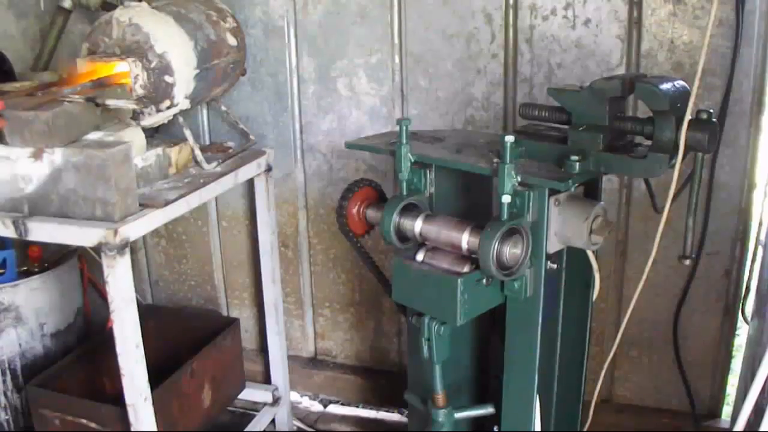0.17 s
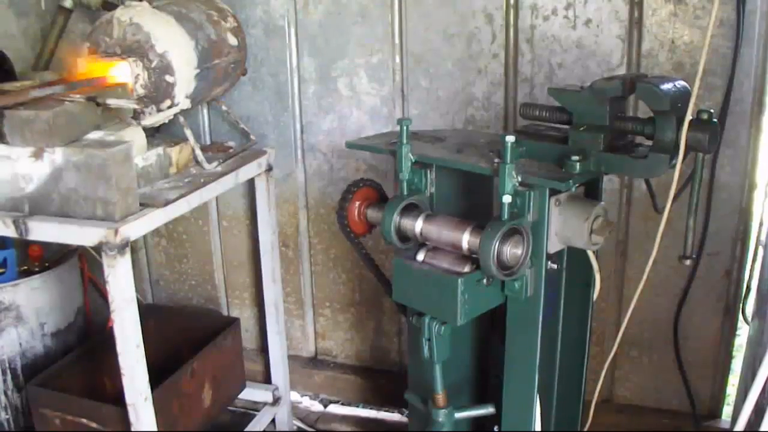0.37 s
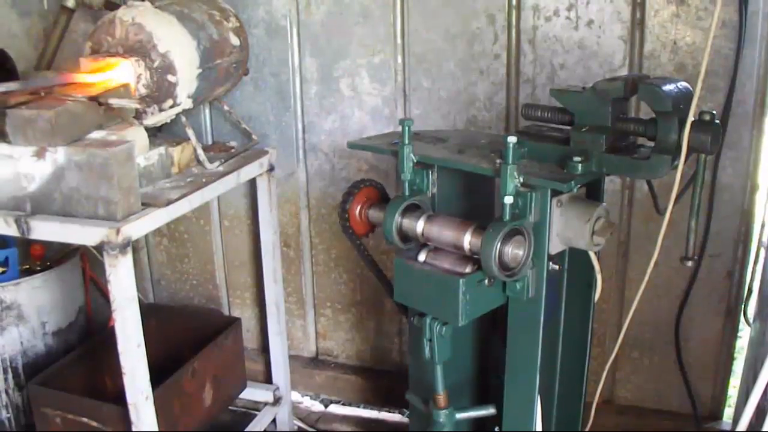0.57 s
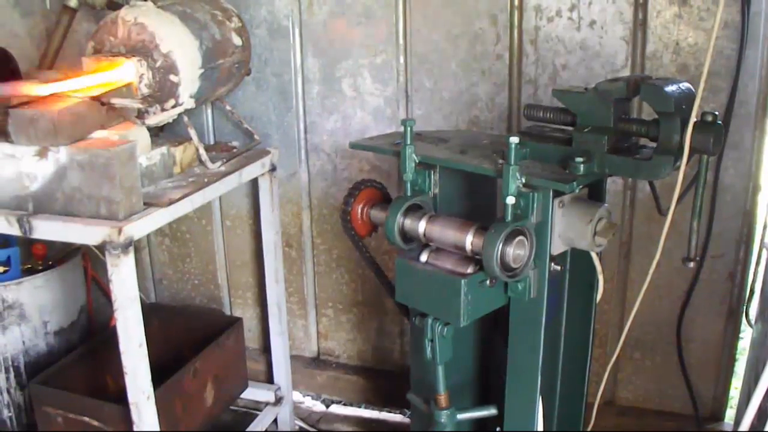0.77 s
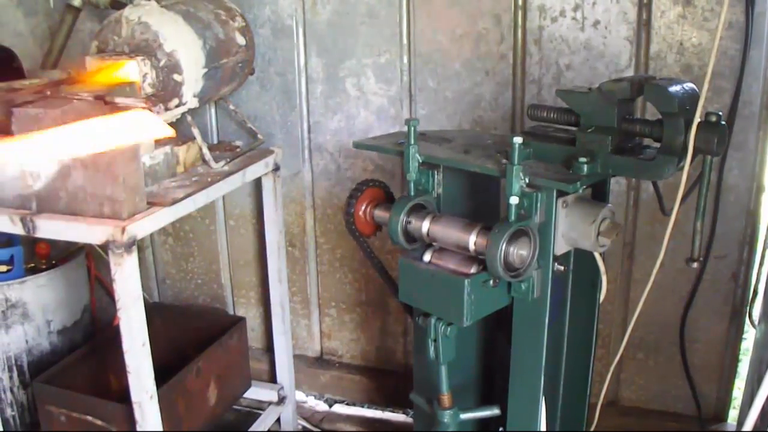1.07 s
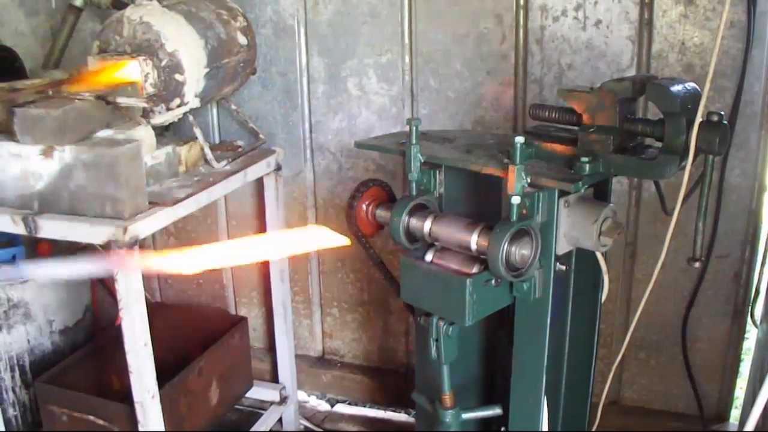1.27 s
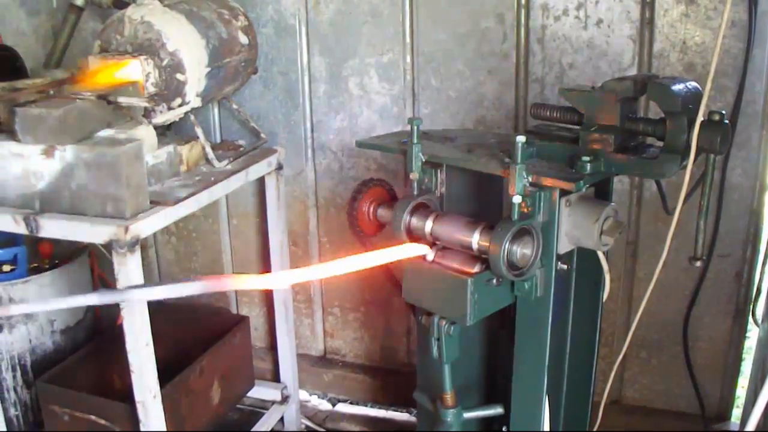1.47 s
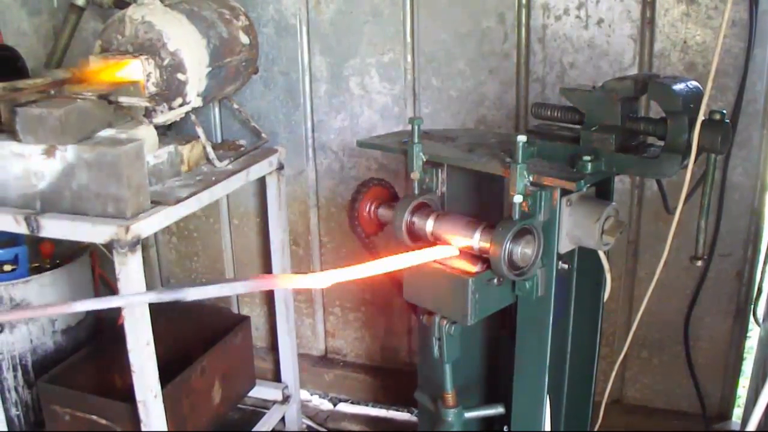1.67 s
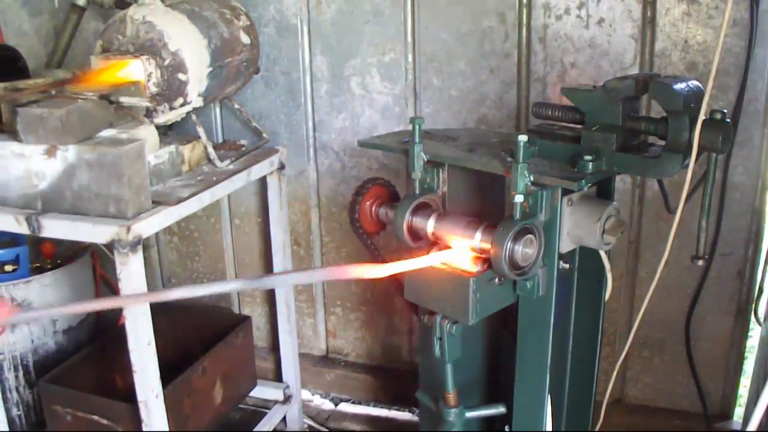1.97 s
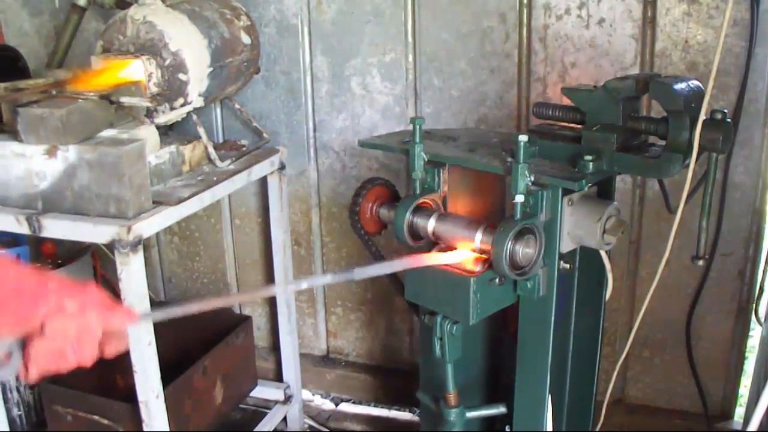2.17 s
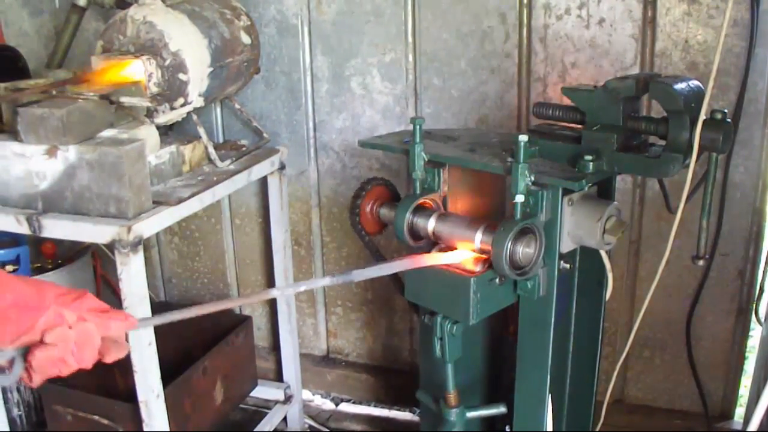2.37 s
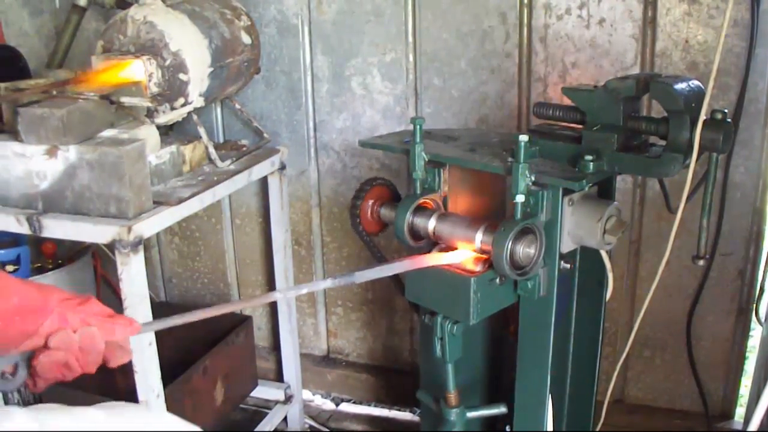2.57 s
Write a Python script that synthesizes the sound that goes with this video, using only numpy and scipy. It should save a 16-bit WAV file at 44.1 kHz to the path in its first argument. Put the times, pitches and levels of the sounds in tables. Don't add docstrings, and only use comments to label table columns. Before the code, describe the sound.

A gas forge roars from just after 0.07 s, following brief silence, to the cut-off near 2.7 s. Its deep, hollow flutter carries steady air and gas hiss. Frequent irregular pressure surges click and make the level dip and recover. A faint mill whine wavers underneath, stronger around 0.7 and 1.3 s. Small steel ticks fall near 0.46, 0.66, 1.3, 2.0 and 2.2 s.

```python
import sys
import numpy as np
from scipy import signal
from scipy.fft import rfft, irfft, next_fast_len
from scipy.io import wavfile
from scipy.ndimage import uniform_filter1d, minimum_filter1d, map_coordinates

SR = 44100
rng = np.random.default_rng(int(sys.argv[2]) if len(sys.argv) > 2 else 0)


def voltage_ratio(level):
    return 10 ** (np.asarray(level, float) / 20)


def store_pcm(level_fs):
    pcm = np.round(np.clip(level_fs, -1, 1) * 32767).astype(np.int16)
    wavfile.write(sys.argv[1], SR, np.atleast_2d(pcm).T)


N = 119511

# t/s, swing/full scale, gain cut/dB, first snap/dB
STRONG_SURGES = [(0.1215, -0.95, 3.7, 1.0), (0.1772, -0.83, 3.0, 1.4), (0.3122, 0.76, 0.0, 1.2),
                 (0.3545, -0.71, 2.8, 1.3), (0.43, -0.71, 2.1, 1.5), (0.4427, 0.75, 4.3, 1.2),
                 (0.5315, 0.71, 5.5, 1.2), (0.6722, -0.84, 1.5, 1.6), (0.781, -0.74, 1.0, 2.0),
                 (0.8187, -0.76, 3.7, 1.5), (0.8555, 0.73, 2.4, 0.4), (0.9263, -0.82, 2.9, 1.6),
                 (1.0202, 0.73, 4.3, 1.9), (1.1713, -0.98, 5.1, 2.5), (1.3448, 0.39, 2.7, 0.6),
                 (1.3938, 0.84, 1.6, 0.8), (1.4073, 0.74, 5.4, 1.5), (1.4832, 0.71, 4.6, 1.8),
                 (1.5859, -0.79, 3.4, 1.0), (1.6812, -0.75, 4.1, 1.8), (1.7433, 0.8, 4.8, 1.4),
                 (1.8895, 0.77, 2.4, 1.7), (1.9986, -0.99, 1.3, 1.5), (2.0379, 0.76, 3.1, 1.1),
                 (2.0801, 0.9, 3.1, 1.5), (2.1876, 0.91, 6.4, 2.1), (2.3031, -0.89, 4.3, 2.8),
                 (2.3985, -0.74, 4.7, 1.1), (2.5071, -1.0, 1.9, 2.9), (2.5977, 0.95, 2.6, 2.3)]
# t/s,
# swing/full scale, gain cut/dB, first snap/dB
WEAK_SURGES = [(.0705, -.55, .1, .1), (.11, -.4, .3, .8), (.1536, -.7, .3, .7), (.195, .4, 1.5, .2),
               (.5145, .47, .3, .9), (.5955, .61, .3, 1.3), (.69, -.6, 1.5, .2), (.7681, .8, .3, 1.3),
               (.8883, -.7, .5, .8), (1.052, -.8, .4, .7), (1.195, .4, 2, .4), (1.8074, -.7, .3, .8),
               (2.3672, -.64, .3, 1.5), (2.4944, .68, .3, 1.1), (2.53, -.5, 1.5, .3),
               (2.7076, .7, 1.5, 1.2)]
# t/s, flame strength/dB, draught swell/dB
FIRE = [(0, -21.5, -4.7), (.25, -12, 2.3), (.5, -14, 0.3), (.75, -11.5, 2.5), (.95, -13.5, 0.1),
        (1.15, -12.5, 2.5), (1.25, -11, 1.2), (1.35, -12, 1.7), (1.6, -14.5, 0.8), (1.85, -12, 1.7),
        (2.0, -13, 0.8), (2.2, -13, 0.6), (2.45, -10.5, 1.05), (2.71, -12, 2.2)]


def unit(x):
    return x / np.sqrt(np.mean(x ** 2) + 1e-20)


def wobble(rate):
    points = rng.standard_normal(int(N * rate / SR) + 4)
    return map_coordinates(points, [np.arange(N) * rate / SR])


def noise(response, patchy_db):
    grid = signal.stft(rng.standard_normal(N + 512), nperseg=512)[2]
    patches = uniform_filter1d(rng.standard_normal(grid.shape), 6, 0)
    patches = uniform_filter1d(patches, 10, 1)
    x = signal.istft(grid * voltage_ratio(patchy_db * unit(patches)), nperseg=512)[1][:N]
    m = next_fast_len(N + 8192)
    shaped = rfft(x, m) * response(np.fft.rfftfreq(m, 1 / SR))
    return unit(irfft(shaped, m)[:N])


def colour(points):
    f, db = np.transpose(points)
    return lambda hz: voltage_ratio(np.interp(np.log(hz + 1), np.log(f + 1), db))


def peak(hz, centre, width):
    return 1j * hz * width / (centre ** 2 - hz ** 2 + 1j * hz * width)


def chamber_ring():
    mode_hz = [132, 166, 195, 250, 293, 322, 358, 376, 432, 508]
    # width/Hz, level/dB
    modes = [(28, -13.5), (9, 3.5), (16.5, 0.5), (39.8, -3.5), (10.9, 6.5), (14, -1), (12, -5), (13.9, 3.5),
             (20.4, -3.5), (47.4, -6.5)]

    def response(hz):
        power = sum(abs(voltage_ratio(db) * peak(hz, centre, 1.07 * width) ** 2) ** 2
                    for centre, (width, db) in zip(mode_hz, modes))
        low_cut = hz ** 2 / (hz ** 2 + 110 ** 2)
        high_cut = 1 / (1 + (hz / 620) ** 4)
        return low_cut * high_cut * np.sqrt(power)

    return noise(response, patchy_db=0.6)


def flame(strength_db):
    # f/Hz, level/dB per Hz
    roar_colour = [(15, -60), (25, -27), (65, -11.5), (167, 7), (295, -9), (374, 10.5), (480, -16.5),
                   (700, -21.5), (910, -59), (1540, -120)]
    broad = noise(colour(roar_colour), patchy_db=0.17)
    roar = unit(chamber_ring() + voltage_ratio(-5) * broad)
    roar = roar * voltage_ratio(strength_db - 0.2 * wobble(25.46))

    calm = 0.72
    gain = voltage_ratio(gain_db())
    need = np.minimum(1, calm / (abs(roar) * gain + 1e-9))
    half = 1200
    x = np.pad(roar * uniform_filter1d(minimum_filter1d(need, size=301), size=301), (0, half))

    surge_hz, surge_s, lead_s = 270, .0024, .0003
    u = np.arange(-half, half) / SR
    hump = np.exp(-(u / surge_s) ** 2)
    for s, swing, *_ in [*STRONG_SURGES, *WEAK_SURGES]:
        i = int(s * SR)
        pitch = surge_hz * rng.uniform(0.84, 1.283)
        wave = 0.99 * swing / gain[i - 2] * np.cos(2 * np.pi * pitch * (u + lead_s))
        change = hump * (wave - x[i - half:i + half])
        x[i - half:i + half] += change - change.sum() * hump / hump.sum()
    return x[:N]


def hiss(swell_db):
    # f/Hz, level/dB per Hz
    air_colour = [(290, -33), (500, -6), (842, -10.5), (950, -12), (1210, -14.5), (1790, -16),
                  (2370, -18.5), (3430, -13), (5500, -39.5), (7150, -82), (12100, -120)]
    # f/Hz, level/dB per Hz
    jet_colour = [(2940, -30), (5000, -33.5), (5990, -7), (8200, 5.5), (12000, -12), (13400, -11),
                  (15900, -22), (16300, -28), (16500, -54)]
    shared_db = swell_db + 0.26 * wobble(39.72) + 0.24 * wobble(120)
    air = voltage_ratio(-24 + shared_db) * noise(colour(air_colour), patchy_db=0.62)
    jet = voltage_ratio(-44.5 + shared_db) * noise(colour(jet_colour), patchy_db=0.5)
    return air + jet


def mill_whine():
    whine_hz = [959, 1389, 1590, 1791, 2202, 3360]
    # width/Hz, rms level/dB
    whine = [(31.7, -35), (60, -41), (4, -50.5), (11.7, -40.5), (25, -45.5), (80, -66)]
    # t/s, level/dB
    load = [(0.1, -42), (0.58, -33), (0.68, -29), (1.29, -38), (1.33, -28), (1.47, -39), (1.52, -36),
            (2.34, -35), (2.7, -42)]
    lines = []
    for centre, (width, db) in zip(whine_hz, whine):
        tone = noise(lambda hz: peak(hz, centre, width) ** 2, patchy_db=-1.5)
        lines.append(voltage_ratio(db + 0.47 * wobble(6.9)) * tone)
    load_db = np.interp(np.arange(N) / SR, *np.transpose(load))
    lines[0] = lines[0] * voltage_ratio(load_db - np.mean(load, axis=0)[-1])
    return sum(lines)


def steel_ticks():
    # t/s, level/dB, main ring f/Hz, crack level/dB
    ticks = [
        (0.461, -19, 3440, -8),
        (0.663, -19.5, 1860, -32),
        (1.269, -22, 3340, -35),
        (1.321, -22, 910, -35),
        (1.989, -17, 1790, -28),
        (2.173, -24, 1520, -30),
    ]
    ring_s, crack_s = 0.046, 0.0051
    x, t = np.zeros(N), np.arange(SR // 10) / SR
    for s, db, hz, crack_db in ticks:
        ring = np.sin(2 * np.pi * hz * t) * voltage_ratio(-60 * t / ring_s)
        ring = ring * (1 - np.exp(-t / 0.00087))
        crack = voltage_ratio(crack_db - 60 * t / crack_s) * rng.standard_normal(len(t))
        x[int(s * SR):][:len(t)] += voltage_ratio(db) * (ring + crack)
    return x


def gain_db():
    recover_s, recover_shape, settle_s = 0.12, 1.02, 0.003
    t, db = np.arange(N) / SR, np.full(N, 3.5)
    for s, _, cut_db, snap_db in [*STRONG_SURGES, *WEAK_SURGES[1:]]:
        i = int(s * SR)
        u = abs(t[i:] - s)
        depth = cut_db + (snap_db - cut_db) * np.exp(-u / settle_s)
        db[i:] -= np.exp(-(u / recover_s) ** recover_shape) * depth
    return db


def scene():
    s, strength_db, swell_db = np.transpose(FIRE)
    t = np.arange(N) / SR
    forge = flame(np.interp(t, s, strength_db)) + hiss(np.interp(t, s, swell_db))
    return (forge + mill_whine() + steel_ticks())[None]


def top_cut(x):
    return signal.sosfilt(signal.butter(12, 16740, fs=SR, output="sos"), x)


def record(dry):
    step_db, ceiling = .3, .99
    x = dry * voltage_ratio(np.round(gain_db() / step_db) * step_db)
    x = x / (1 + abs(x / ceiling) ** 16) ** (1 / 16)
    x = signal.sosfilt(signal.butter(1, 35.5, "high", fs=SR, output="sos"), x)
    m = next_fast_len(N + 8192)
    x = irfft(rfft(x, m) * (np.fft.rfftfreq(m, 1 / SR) < 15800), m)[:, :N]
    started = np.arange(N) >= .0696 * SR
    return top_cut(x * started)


dry = scene()
out = record(dry)
store_pcm(out)
```